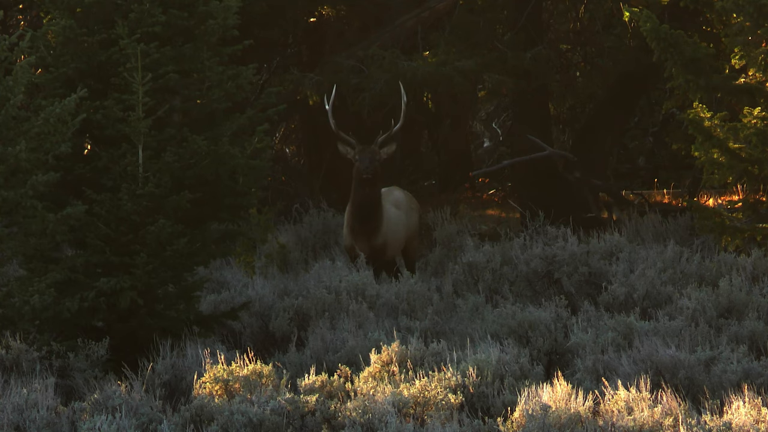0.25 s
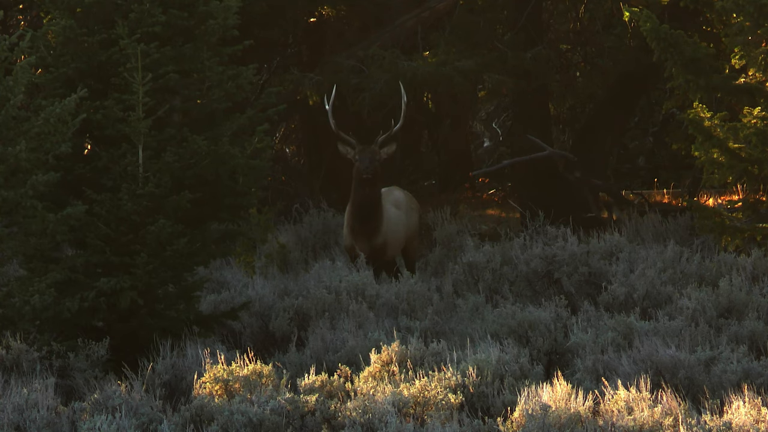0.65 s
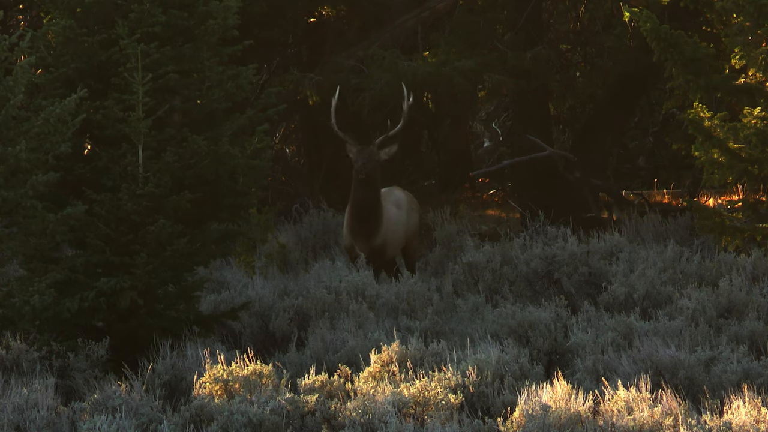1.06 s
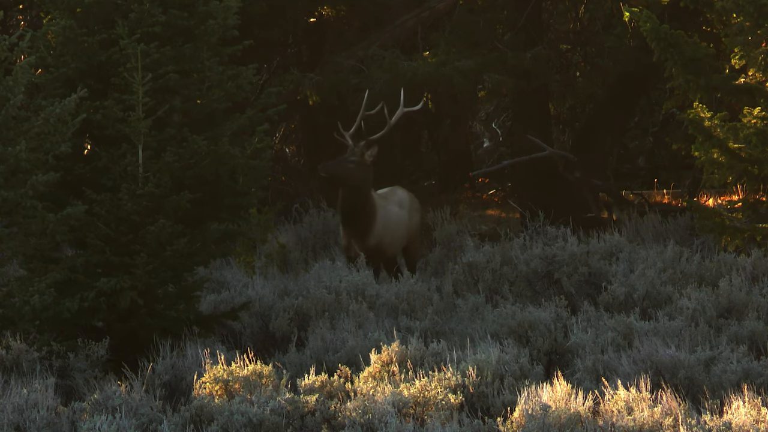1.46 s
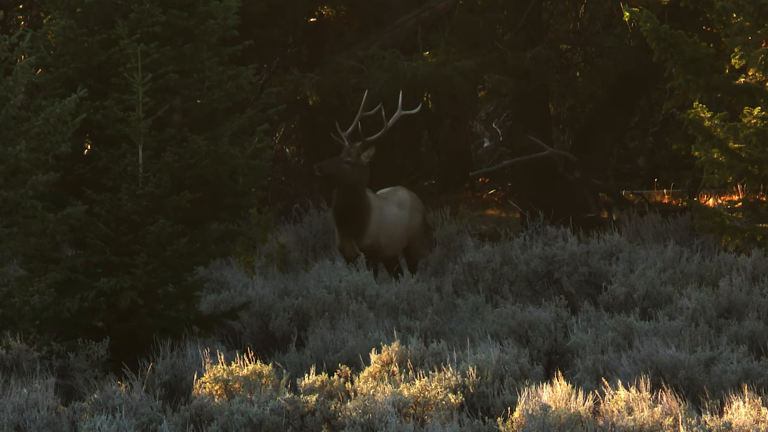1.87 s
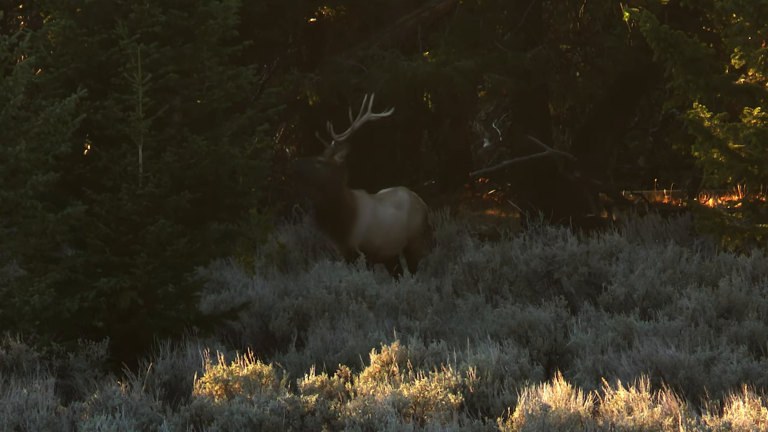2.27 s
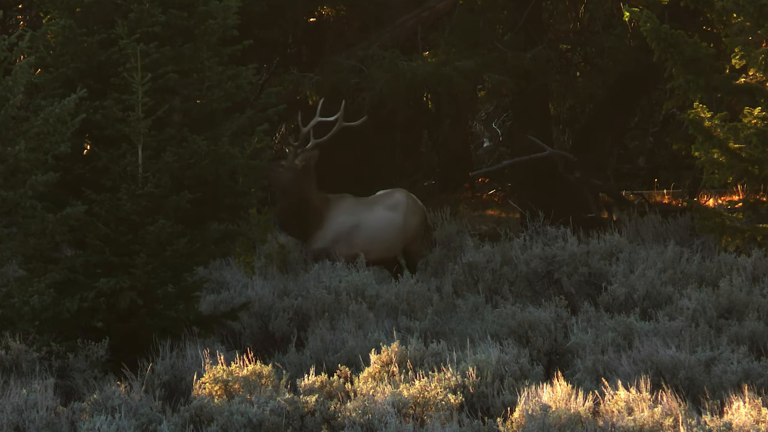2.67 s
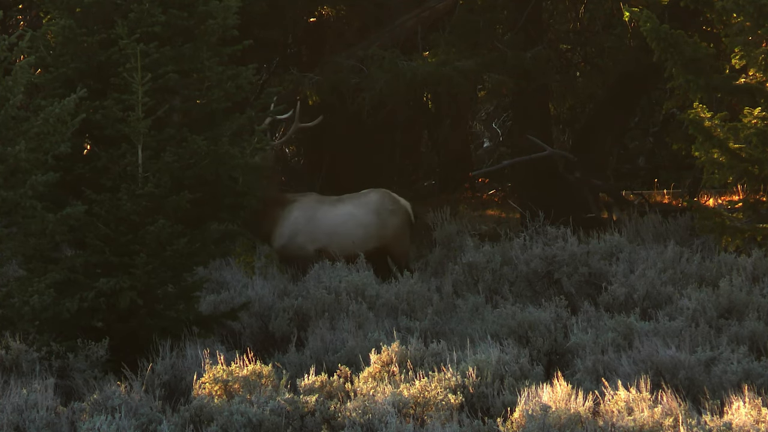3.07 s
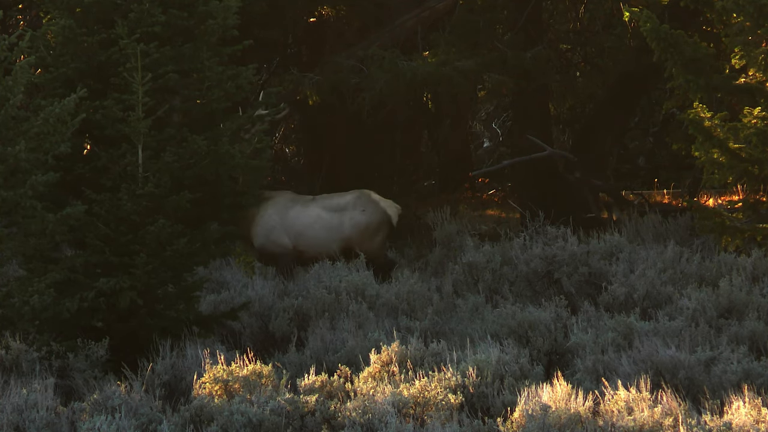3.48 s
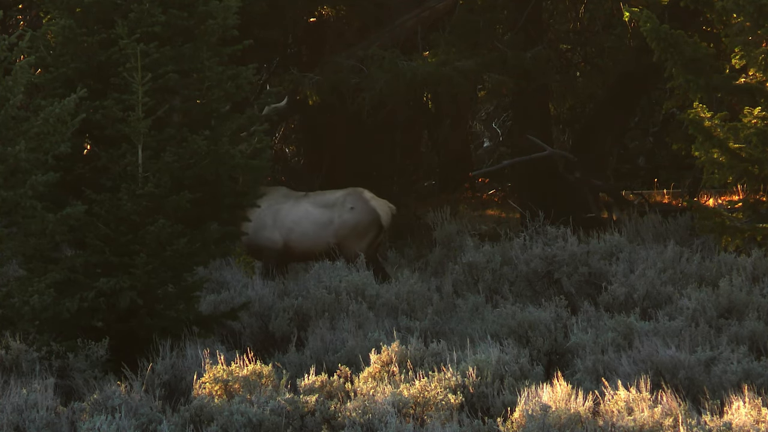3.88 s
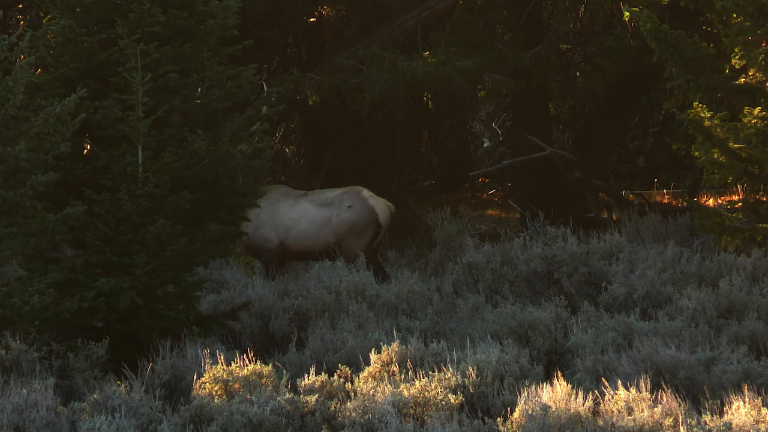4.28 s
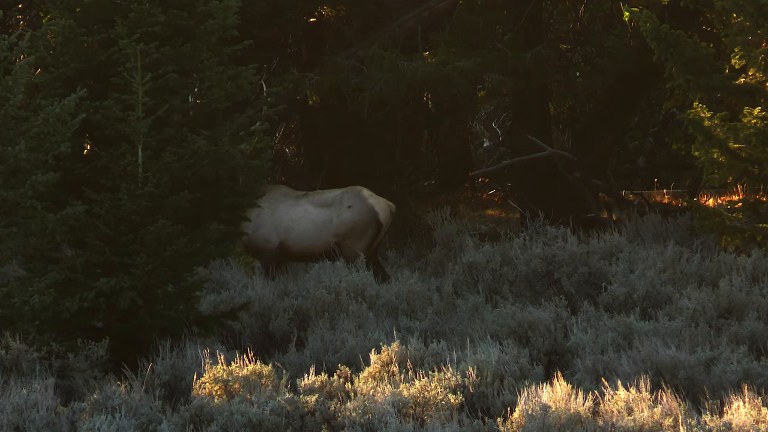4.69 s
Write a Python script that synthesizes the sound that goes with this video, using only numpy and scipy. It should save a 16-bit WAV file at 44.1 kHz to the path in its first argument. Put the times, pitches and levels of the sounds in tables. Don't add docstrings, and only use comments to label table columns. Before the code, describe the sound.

A bull elk calls twice, about two and a half seconds apart: bright, abrupt, whistly mews sliding quickly down into breathy low tones and scattering briefly off trunks. Between them are twig snaps, a tiny brush of sage and thin far bird notes. Steady preamp hiss and faint, regularly pulsing scrapes of the lens motor sit beneath, slightly stronger on the right.

```python
import sys
import numpy as np
from scipy import signal
from scipy.fft import irfft
from scipy.io import wavfile
from scipy.ndimage import uniform_filter1d

SR = 44100
rng = np.random.default_rng(int(sys.argv[2]) if len(sys.argv) > 2 else 0)


def makeup_ratio(level_db):
    decades = np.asarray(level_db, float) / 20
    return 10 ** decades


def wrap_up_sound(samples):
    columns = np.atleast_2d(samples).T
    tamed = np.clip(columns, -1, 1)
    steps = np.round(tamed * 32767).astype(np.int16)
    wavfile.write(sys.argv[1], SR, steps)


N = 213355


def evened(x):
    return x / np.sqrt(np.mean(x ** 2) + 1e-20)


def wander(count, size):
    return evened(uniform_filter1d(rng.standard_normal(count), size=size))


def read(points, hz):
    f, value = np.transpose(points)
    return np.interp(np.log(hz + 1), np.log(f + 1), value)


def add(mix, s, sound):
    part = mix[..., round(s * SR):round(s * SR) + sound.shape[-1]]
    part += sound[..., :part.shape[-1]]


def panned(db, pan_db):
    return makeup_ratio(db + np.array([[pan_db], [-pan_db]]) / 2)


def resonate(x, hz, width_hz):
    turn = np.exp(2j * np.pi * np.cumsum(hz * np.ones(x.shape[-1])) / SR)
    r = np.exp(-np.pi * width_hz / SR)
    return 2 * (turn * signal.lfilter([(1 - r) ** 2], [1, -2 * r, r * r], x / turn)).real


def hiss():
    # (frequency [Hz], level [dB per Hz])
    density = [(20, -4), (60, -2.5), (160, 2), (300, -1), (450, -7), (620, -23), (800, -21), (1000, -2.5),
               (1300, -9), (2000, -4), (3000, -11.5), (4500, -19), (7000, -24.5), (11000, -17.5),
               (15600, -18)]
    # (frequency [Hz], correlation [-1..1])
    likeness = [(60, -0.053), (130, -0.021), (290, -0.13), (640, 0.54), (1410, 0.33), (3100, 0.063),
                (6820, 0.6), (15000, 0.49)]
    level_db, patch_db = -64 + 2.0, 1.9
    frames, hz = N // 256 + 5, np.fft.rfftfreq(1024, 1 / SR)
    a, b, c, d, patches = rng.standard_normal((frames, 513, 5)).T
    patches = uniform_filter1d(patches, size=12, axis=0)
    patches = evened(uniform_filter1d(patches, size=14, axis=1))
    same = np.clip(read(likeness, hz), -1, 1)[:, None]
    left = a + 1j * b
    z = np.array([left, same * left + np.sqrt(1 - same ** 2) * (c + 1j * d)])
    z *= makeup_ratio(read(density, hz)[:, None] + patch_db * patches)
    return makeup_ratio(level_db) * evened(signal.istft(z, nperseg=1024, noverlap=768)[1][:, :N])


def hunting(t):
    # (start [s], stop [s], level [dB], coast-down [dB/s])
    bursts = [(-.25, .3, -60.5, 200), (0.483, 0.975, -59, 250), (1.105, 1.522, -58, 200),
              (1.682, 2.248, -59, 200), (2.397, 2.937, -58, 23), (3.092, 3.543, -58, 20),
              (3.678, 4.19, -58.5, 200), (4.33, 4.9, -60, 200)]
    kick_s, kick_db, wind_s = 0.026, -8.5, 0.12
    ease_db, drop_db, idle_db = -1.5, -5.5, -93.5
    rest_speed, full_speed = 0.98, 1.006
    start, stop, top_db, coast = np.transpose(bursts)[..., None]
    wound = 1 - np.exp(-np.maximum(t - start, 0) / wind_s)
    eased = ease_db * np.clip((t - start) / (stop - start), 0, 1) ** 4
    over_s = np.maximum(t - stop, 0)
    db = top_db + kick_db * (1 - wound) + eased + drop_db * np.minimum(over_s / kick_s, 1) - coast * over_s
    gain = np.clip((t - start) / kick_s, 0, 1) * makeup_ratio(db)
    speed = rest_speed + (full_speed - rest_speed) * (wound * (over_s == 0)).max(0)
    return 20 * np.log10(gain.max(0) + makeup_ratio(idle_db)), uniform_filter1d(speed, size=900)


def motor(depth=0.14, grain_db=0.0, shared=0.58, pan_db=-5.0):
    # (frequency [Hz], width [Hz], level [dB])
    rings = [(202, 238, -11), (657, 2700, -26.5), (1452, 200, -10.5), (2132, 500, -2), (2345, 776, -2.5),
             (2890, 2400, -24.5)]
    # (frequency [Hz], width [Hz], level [dB])
    whine_hz, whine_width_hz, whine_db = (2300, 52, -78)
    step_hz = 60.1
    level_db, speed = hunting(np.arange(N) / SR)
    steps = step_hz * np.cumsum(1 + 0.0386 * wander(N, 4000)) / SR
    throb = 1 + depth * np.cos(2 * np.pi * steps) + 0.22 * np.cos(4 * np.pi * steps)
    grain = makeup_ratio(grain_db * wander(N, 150))
    common, *own = rng.standard_normal((3, N))
    scrape = throb * grain * (np.sqrt(shared) * common + np.sqrt(1 - shared) * np.array(own))
    barrel = sum(makeup_ratio(db) * evened(resonate(scrape, hz * speed, width)) for hz, width, db in rings)
    whine = makeup_ratio(whine_db) * evened(resonate(common[::-1], whine_hz, whine_width_hz))
    return panned(level_db - 2.4, pan_db) * barrel + whine


def peep(s, length_s, from_hz, to_hz, db):
    count = round(length_s * SR)
    u = np.arange(count) / (length_s * SR)
    hz = to_hz + (from_hz - to_hz) * np.exp(-u / .1) + 70 * wander(count, 150)
    flutter = makeup_ratio(3.6 * wander(count, 200))
    tone = np.sin(2 * np.pi * np.cumsum(hz) / SR)
    return s, makeup_ratio(db) * flutter * signal.windows.tukey(count, .3) * tone


def effort(t, peak_s, length_s, effort_db, tired_db):
    rise_s, rise_db = 0.02, -59
    pop_s, pop_db, settle_s = .007, 7.5, 0.012
    swell_s, swell_db, sag_shape = 0.067, 0, 2.5
    release_s, release_db = 0.031, -18
    u = t - peak_s
    rise = rise_db * np.clip((-pop_s - u) / rise_s, 0, 1)
    settle = np.exp(-np.maximum(u, 0) / settle_s)
    pop = pop_db * np.where(u < 0, np.clip(1 + u / pop_s, 0, 1), settle)
    swell = swell_db * np.clip(u / swell_s, 0, 1) ** 2
    sag = (tired_db - swell_db) * np.clip((u - swell_s) / (length_s - swell_s), 0, 2) ** sag_shape
    release = release_db * np.maximum(u - length_s, 0) / release_s
    return effort_db + rise + pop + swell + sag + release


def mew(row, glide, tilt_db=-7.0, first_db=2.0, rumble_db=-21.0, surge=0.33, lock_db=1.3, flicker_db=1.5):
    pull_hz, pull = 2600, .06
    clear_hz, breathy_hz, clear_db, breathy_db, slip_db = 1460, 700, -52, -27, 11.
    leak_shape, tired_tilt, tired_from_db = .6, .2, 7.
    close_s, open_db = .003, -13
    t = np.arange(round(.27 * SR)) / SR + row[0] - .026
    count = len(t)
    effort_db = uniform_filter1d(effort(t, *row), size=90)
    free_hz = uniform_filter1d(np.interp(t, *np.transpose(glide)), size=90)

    order = pull_hz / free_hz
    slack = np.clip((clear_hz - free_hz) / (clear_hz - breathy_hz), 0, 1)
    breath_db = clear_db + (breathy_db - clear_db) * slack ** leak_shape
    breath_db += slip_db * np.cos(2 * np.pi * order) * np.minimum(slack * 4, 1) / (order - 1)
    hz = pull_hz / (order + pull * np.sin(2 * np.pi * order))
    shake = (.002 + .006 * np.clip((1500 - hz) / 600, 0, 1)) * wander(count, 60)
    turns = np.cumsum(hz * (1 + shake)) / SR

    k = np.arange(1, 30)[:, None]
    flicker = evened(uniform_filter1d(rng.standard_normal((count, len(k))), size=350, axis=0)).T
    caught = uniform_filter1d(3 * np.exp(-((order + .02) % 1) / .35) - 1.1, size=60)
    tilt_db = tilt_db + lock_db * caught * np.clip(order - 1.7, 0, .4) * 5 / order
    tilt_db = tilt_db + tired_tilt * np.minimum(effort_db + tired_from_db, 0) * slack
    tilt_db = tilt_db + open_db * np.clip((row[0] - t) / close_s - 1, 0, 1)
    tilt_db = tilt_db + flicker_db * flicker * np.clip((1560 - hz) / 200, .15, 1)
    partial_db = tilt_db * np.log2(k) + (first_db + surge * np.maximum(effort_db, 0)) * (k == 1)
    folds = makeup_ratio(partial_db) * (k * hz < SR / 2.5) * np.cos(2 * np.pi * k * turns)
    puffs = (1 + 1.1 * np.cos(2 * np.pi * turns)) * np.gradient(rng.standard_normal(count)) * 4
    voice = np.sqrt(2) * (folds.sum(0) + makeup_ratio(breath_db) * puffs)

    left, right = rng.standard_normal((2, count))
    low = signal.butter(5, 420, fs=SR, output="sos")
    rumble = signal.sosfilt(low, [left, right - .5 * left])
    rumble = signal.lfilter([1], [1, -.95], signal.lfilter([1, -1], [1, -.994], rumble))
    rumble = makeup_ratio(breath_db + rumble_db) * evened(rumble)
    return t[0], makeup_ratio(effort_db) * np.vstack([voice, rumble])


def ports(x):
    # (frequency [Hz], gain [dB])
    left_path = [(500, -52.5), (850, -61), (1300, -34), (1580, -26.5), (1850, -35.5), (2620, -11),
                 (2950, -24), (3200, -10), (4150, -29), (4600, -33), (6100, -34), (7000, -40), (9500, -40),
                 (12000, -55.5), (16000, -46)]
    # (frequency [Hz], gain [dB])
    right_path = [(500, -44.5), (800, -54.5), (1300, -26), (1580, -23), (1800, -30.5), (2580, -9),
                  (3050, -20), (3300, -13), (4050, -22.5), (4500, -29), (6800, -41.5), (9500, -33.5),
                  (12000, -46.5), (16000, -60)]
    # (frequency [Hz], lead [rad])
    left_lead = [(500, .8), (1000, 0), (1400, -.3), (1600, -.9), (1800, -2.5), (2000, -1.5), (2450, -1.5),
                 (2900, -3), (3200, -4.1), (4500, -4.3), (5800, -4.8), (6500, -6.28), (16000, -6.28)]
    hz = np.abs(np.fft.fftfreq(8192, 1 / SR))
    gain = np.log(makeup_ratio([read(left_path, hz), read(right_path, hz)]))
    phase = (-signal.hilbert(gain[1]).imag + np.outer([1, 0], read(left_lead, hz)))[:, :4097]
    taps = irfft(np.exp(gain[:, :4097] + 1j * phase))
    taps = np.roll(taps, 200, axis=1)[:, :2048]
    return signal.oaconvolve(x[None], taps, axes=1)[:, 200:200 + N]


def bounces(x):
    # (delay [s], left [dB], right [dB])
    echoes = [(.0013, -31.5, -27), (.0031, -21.5, -15), (.0062, -23.5, -15.5), (0.01, -12, -29.5)]
    taps = np.zeros((2, 800))
    taps[:, 0] = 1
    for delay_s, *db in echoes:
        taps[:, round(delay_s * SR)] = -makeup_ratio(np.array(db))
    return signal.oaconvolve(x, taps, axes=1)[:, :N]


def trees(x, build_s=0.022):
    # (frequency [Hz], t60 [s])
    decay = [(300, 0.32), (1500, 0.2), (3000, 0.58), (4200, 0.32), (5500, 0.32), (12000, 0.35)]
    hz, t, z = signal.stft(rng.standard_normal((2, SR // 2 + 8000)), SR, nperseg=256)
    build = 1 - np.exp(-(t / build_s) ** 2)
    die = makeup_ratio(-60 * t / read(decay, hz)[:, None])
    tail = signal.istft(z * build * die, SR, nperseg=256)[1]
    return signal.fftconvolve(x, tail / np.linalg.norm(tail[0]), axes=1)[:, :N]


def tick(s, db, hz, width_hz, pan_db):
    t = np.arange(900) / SR
    ring = np.exp(-np.pi * width_hz * t) * np.sin(2 * np.pi * hz * t)
    return s, panned(db, pan_db) * ring / abs(ring).max()


def rustle(s, length_s, db, hz, width_hz):
    count = round(length_s * SR)
    crackle = rng.standard_normal(count) * makeup_ratio(2.0 * wander(count, 60))
    return s, makeup_ratio(db) * np.hanning(count) * evened(resonate(crackle, hz, width_hz))


def scene():
    # (onset peak [s], voiced length [s], effort [dB], effort left before release [dB])
    mews = [
        (1.959, .2, 0., -7.5),
        (4.546, 0.16, .5, -5),
    ]
    # (time [s], pitch [Hz])
    glides = [
        [(1.953, 1467), (1.961, 1580), (2.006, 1512), (2.021, 1440), (2.033, 1245), (2.066, 1031), (2.083, 842),
         (2.117, 646), (2.178, 429)],
        [(4.539, 1470), (4.547, 1579), (4.592, 1514), (4.605, 1426), (4.617, 1229), (4.645, 1035), (4.661, 854),
         (4.689, 652), (4.735, 451)],
    ]
    # (time [s], length [s], start pitch [Hz], end pitch [Hz], level [dB])
    peeps = [(0.089, 0.047, 4300, 6480, -65.5), (.172, 0.078, 4600, 6400, -70),
             (.27, 0.069, 4500, 5900, -72), (.31, 0.054, 4200, 5000, -72), (.35, 0.045, 5700, 5870, -80),
             (.385, 0.05, 3700, 4150, -72), (.62, 0.2, 3850, 3810, -74), (.99, 0.194, 4070, 3850, -74),
             (2.299, 0.024, 7900, 8240, -67), (3.6, .09, 6300, 7450, -82), (3.735, 0.053, 5900, 6450, -74)]
    # (time [s], peak [dB], ring [Hz], width [Hz], left-right [dB])
    ticks = [(2.382, -48, 1327, 500, -1), (2.475, -49.5, 400, 149.3, -1), (2.477, -40.5, 1780, 603, 1),
             (2.477, -52, 5600, 3000, 2), (3.498, -43.5, 2400, 1210, 6), (3.515, -47, 2900, 900, 14)]
    # (time [s], length [s], level [dB], centre [Hz], width [Hz])
    brush = (3.482, .045, -65.5, 4000, 4500)
    elk, birds, twigs = np.zeros((3, N)), np.zeros((2, N)), np.zeros((2, N))
    for row in peeps:
        add(birds, *peep(*row))
    for row, glide in zip(mews, glides):
        add(elk, *mew(row, glide))
    for row in ticks:
        add(twigs, *tick(*row))
    add(twigs, *rustle(*brush))
    voice, rumble = elk[0], elk[1:]
    near = bounces(ports(voice))
    beamed = resonate(resonate(voice, 3320, 2200), 3070, 2300)
    scatter = trees(makeup_ratio(-28) * near + makeup_ratio(-40) * beamed + makeup_ratio(-6.5) * birds)
    return near + rumble + scatter + makeup_ratio(-2.0) * birds + twigs + motor() + hiss()


def low_pass(x):
    return signal.sosfilt(signal.butter(12, 15870, fs=SR, output="sos"), x)


def record(dry):
    power = abs(uniform_filter1d((dry ** 2).mean(0), size=300))
    wobble = 1 + 0.37 * evened(uniform_filter1d(rng.standard_normal((2, N)), size=400, axis=1))
    push = resonate(dry[1], 1500, 1200) ** 2 * wobble * makeup_ratio([[16], [17]]) * [[1], [-1]]
    thump = signal.sosfilt(signal.butter(1, 18, "highpass", fs=SR, output="sos"), push)
    thump = signal.sosfilt(signal.butter(3, 190, fs=SR, output="sos"), thump)
    thump = .16 * np.tanh(thump / .16)
    fall_db = np.arange(N) * 213.0 / SR
    held_db = np.maximum.accumulate(10 * np.log10(power + 1e-12) + fall_db) - fall_db
    over_db = np.maximum(held_db + 24, 0)
    lagged_db = signal.lfilter([.004], [1, -.996], over_db)
    ducked = (dry + thump) / makeup_ratio(0.33 * lagged_db)
    edge = signal.firwin(255, 15800, fs=SR)
    return low_pass(signal.oaconvolve(ducked, edge[None], "same"))


dry = scene()
out = record(dry)
wrap_up_sound(out)
```